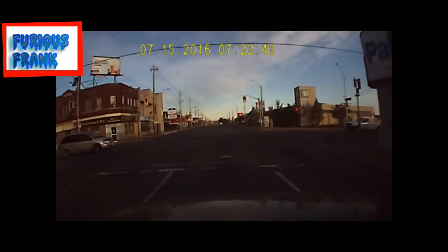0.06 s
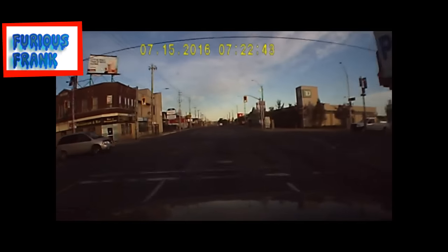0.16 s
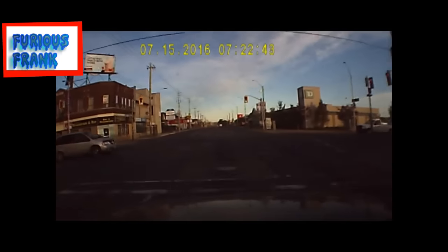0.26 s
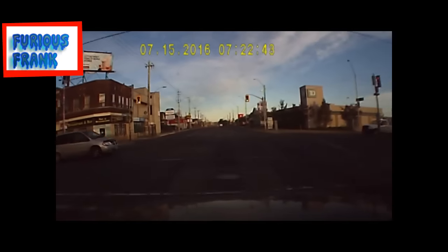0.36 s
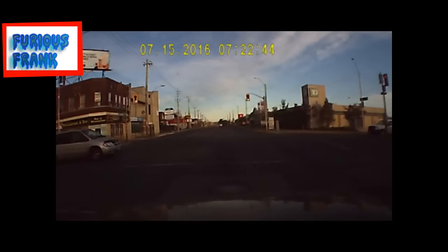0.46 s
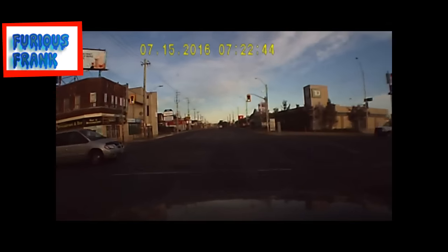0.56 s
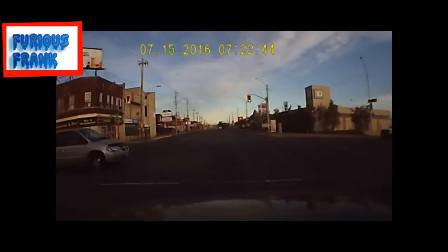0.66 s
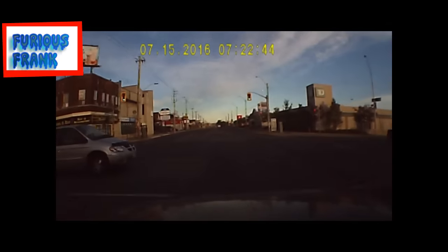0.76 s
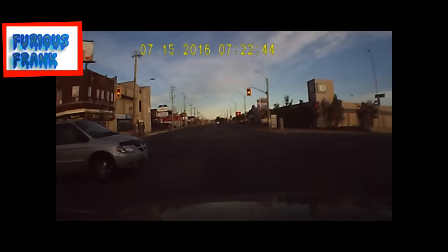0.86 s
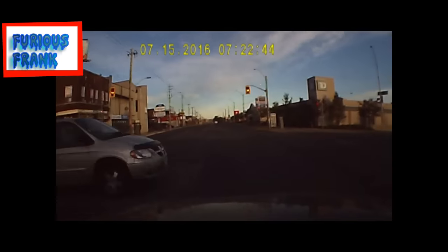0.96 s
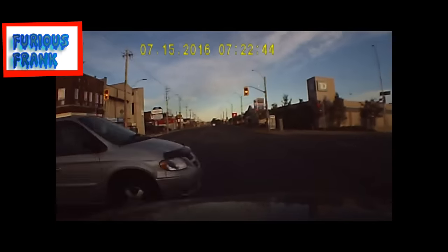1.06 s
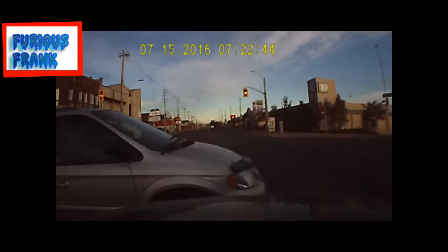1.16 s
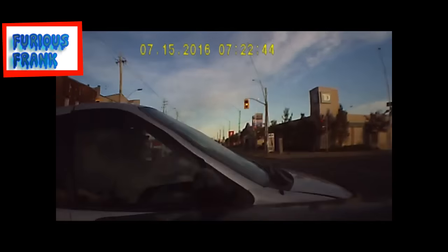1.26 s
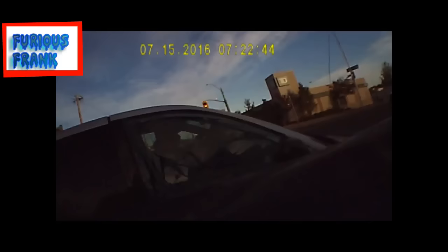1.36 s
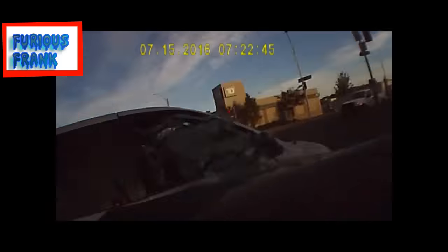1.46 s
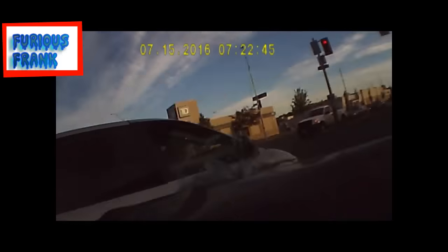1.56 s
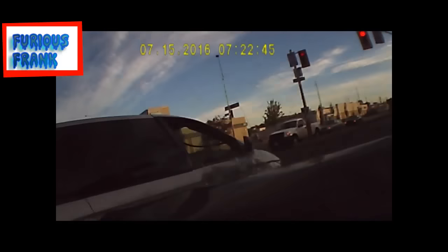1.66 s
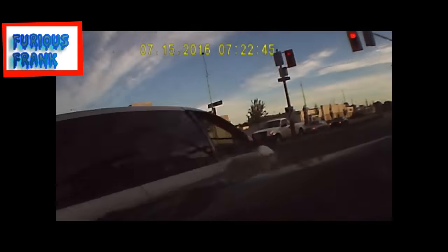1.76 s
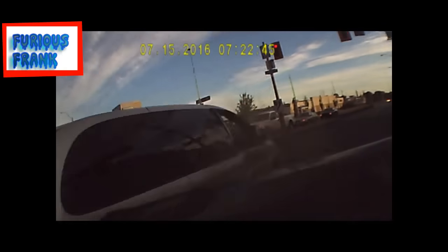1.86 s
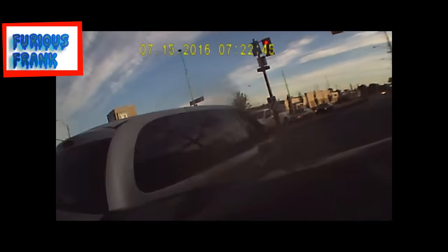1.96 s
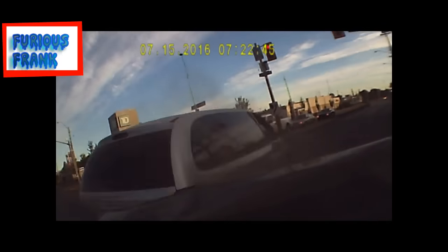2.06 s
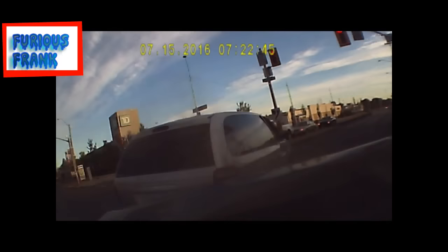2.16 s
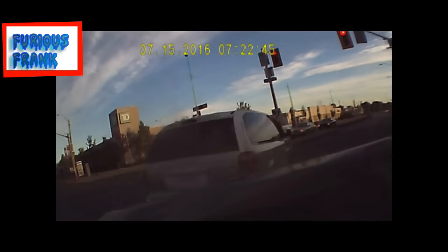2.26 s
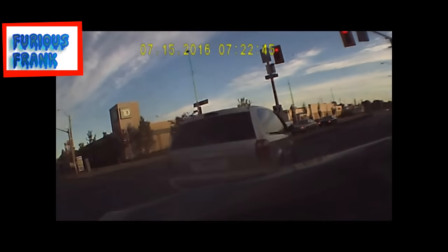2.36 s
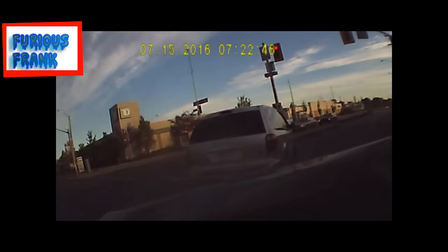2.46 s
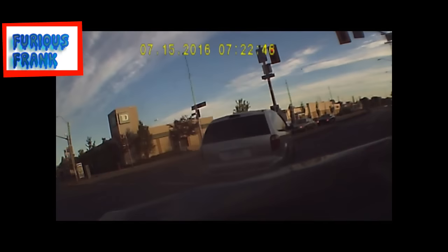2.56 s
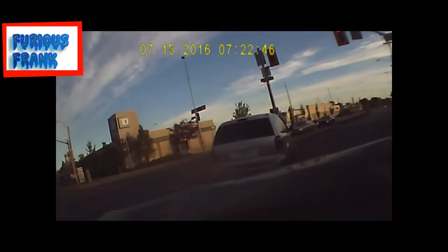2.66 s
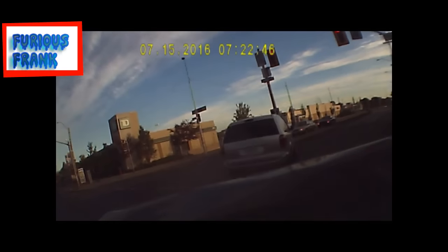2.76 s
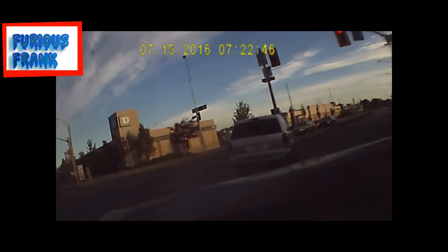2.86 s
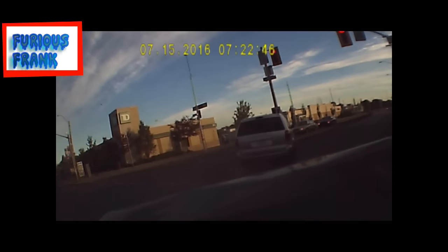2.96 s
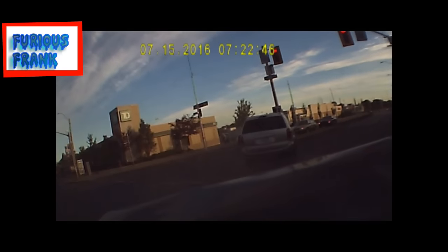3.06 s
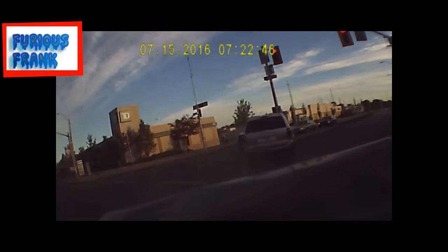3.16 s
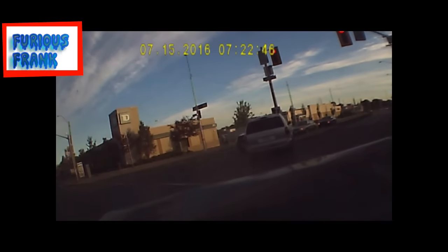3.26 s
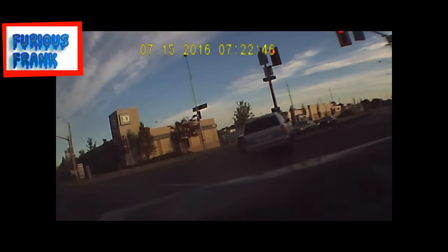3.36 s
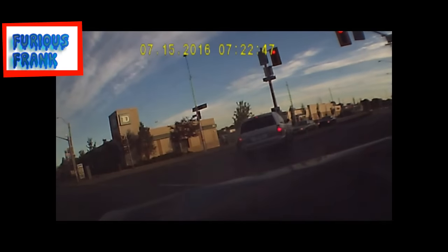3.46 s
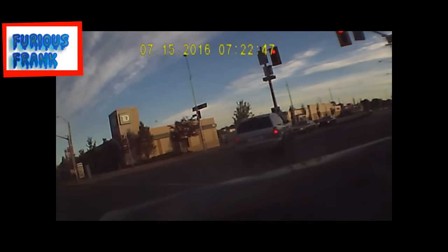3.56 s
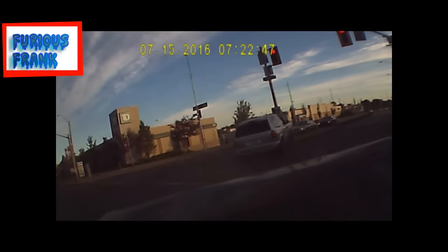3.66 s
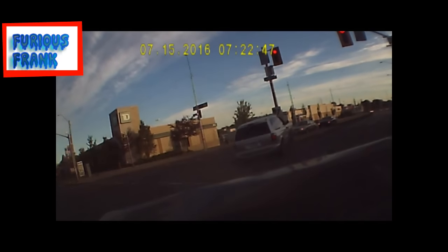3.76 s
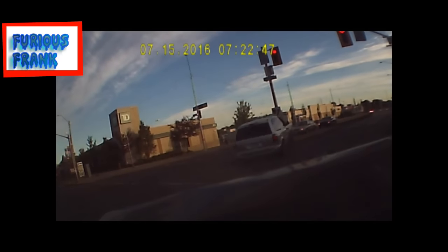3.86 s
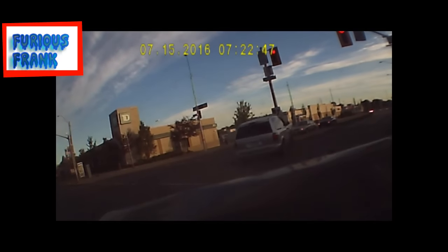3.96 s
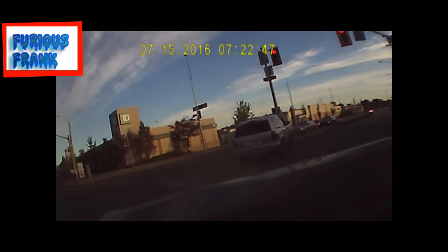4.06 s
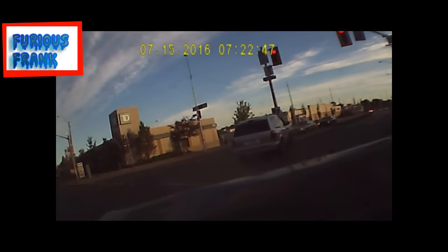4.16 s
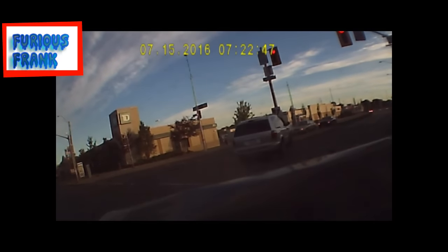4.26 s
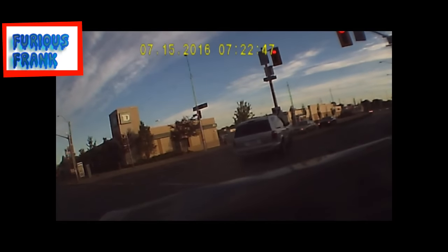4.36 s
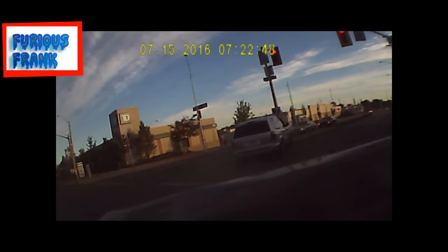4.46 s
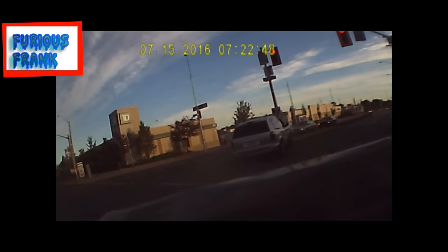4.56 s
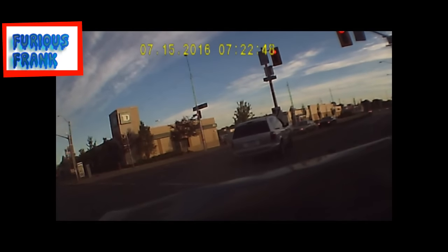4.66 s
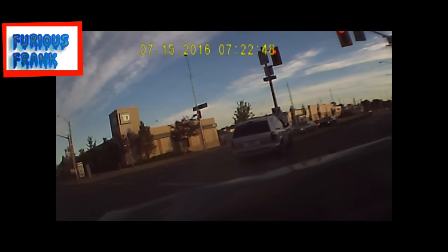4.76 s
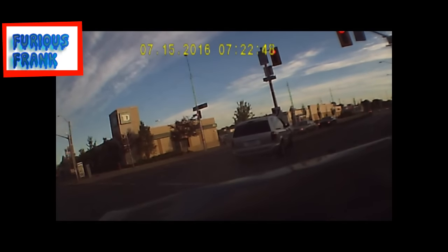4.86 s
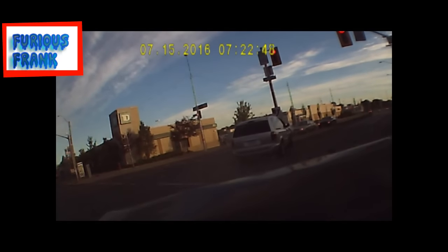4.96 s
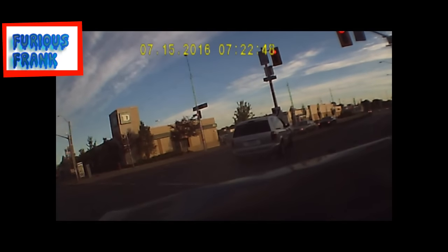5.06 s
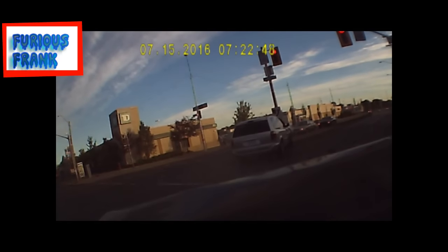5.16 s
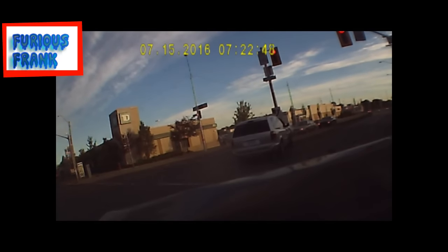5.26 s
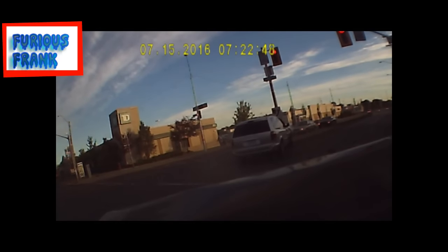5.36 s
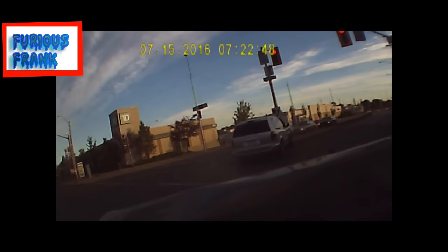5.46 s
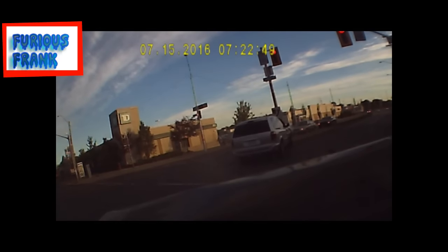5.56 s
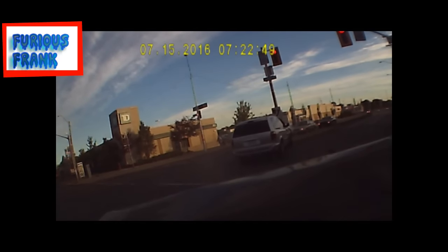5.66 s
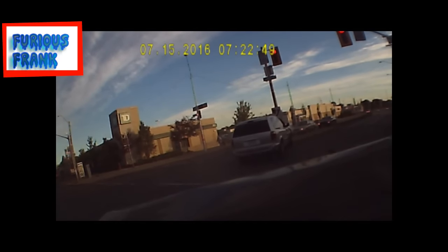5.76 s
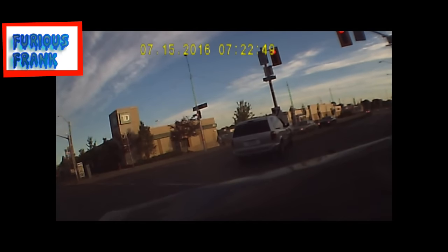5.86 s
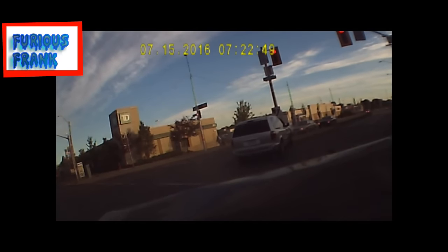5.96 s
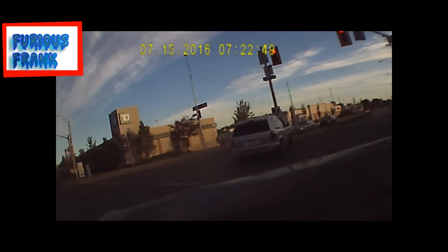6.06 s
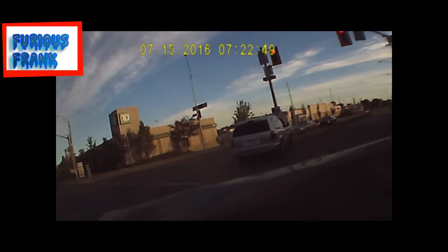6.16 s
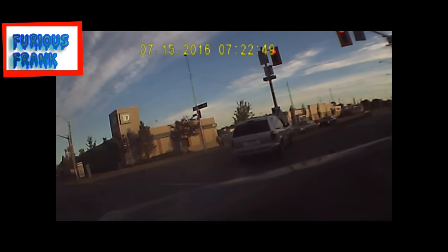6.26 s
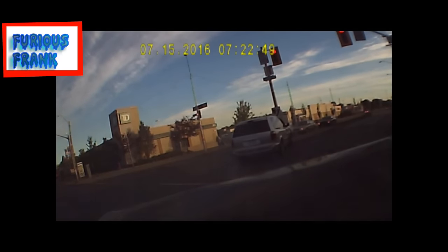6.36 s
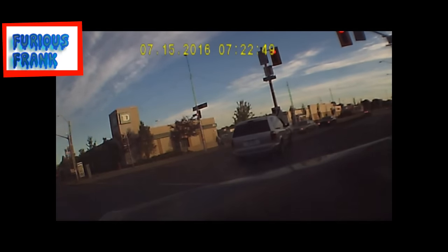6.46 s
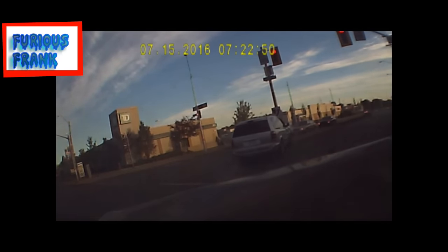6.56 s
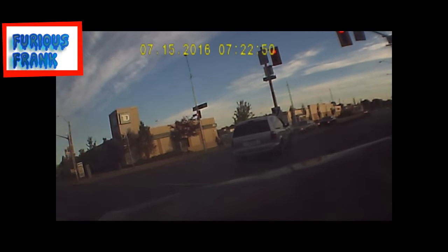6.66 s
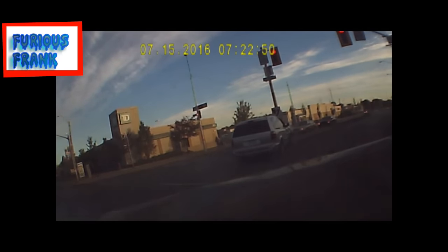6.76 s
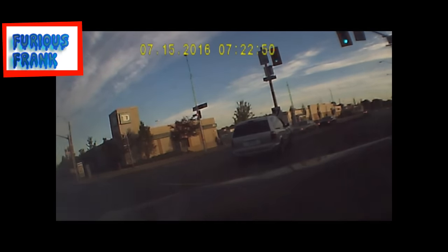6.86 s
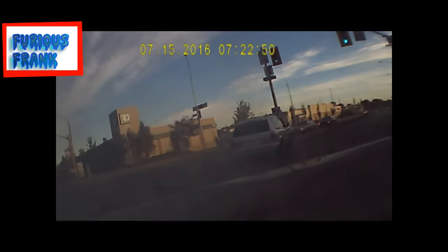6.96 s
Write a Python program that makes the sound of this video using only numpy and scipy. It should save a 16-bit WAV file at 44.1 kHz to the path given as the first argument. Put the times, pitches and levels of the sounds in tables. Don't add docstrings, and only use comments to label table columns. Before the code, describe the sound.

Low road rumble and trim knocks inside a moving car, then a violent overloaded crash, two short horn toots, tyre scrub, and small settling knocks.

```python
import sys
import numpy as np
from scipy import signal
from scipy.fft import rfft, irfft, next_fast_len
from scipy.io import wavfile
from scipy.ndimage import uniform_filter1d, map_coordinates

SR = 44100
rng = np.random.default_rng(int(sys.argv[2]) if len(sys.argv) > 2 else 0)


def gain_from_decibels(decibels):
    exponent = np.asarray(decibels, float) / 20
    return 10 ** exponent


def wav_record(signal):
    frames = np.transpose(np.atleast_2d(signal))
    bounded = np.clip(frames, -1, 1)
    quanta = np.round(bounded * 32767).astype(np.int16)
    wavfile.write(sys.argv[1], SR, quanta)


N = 308700

# time in seconds, force in dB over full scale, brightness in dB.
CRUMPLE = [(1.2, -40, -41), (1.213, 6, -2.5), (1.255, -1.5, 0), (1.275, 6, -8), (1.31, 8, -3),
           (1.34, 9, -10), (1.36, 10, -8), (1.4, 5.5, -6), (1.455, -17, -15), (1.48, -15.5, 1.5),
           (1.55, -9.5, -10.5), (1.64, -44, -22)]
# frequency in Hz, level in dB.
STEEL_TONE = [(20, -5.5), (60, -4.5), (150, 0.5), (300, -5), (500, -9.5), (800, -16)]
# frequency in Hz, level in dB.
SHARD_TONE = [(300, -49), (700, 5.5), (1100, 5.5), (1600, -5.5), (3000, -12), (8000, -20), (16000, -30)]
# start in seconds, length in seconds, push in full scales.
SLAMS = [(1.211, .06, -2.4), (1.2705, .02, 2), (1.29, .0195, -16), (1.3085, .0275, 1.4), (1.336, .019, -8),
         (1.3395, .003, 4.2), (1.4375, .0015, -1.2), (1.4125, .002, 3), (1.359, .009, -1.6),
         (1.368, .017, 1.2), (1.386, .0075, -1.8), (1.393, .012, 3.4), (1.405, .003, -1.5),
         (1.408, .003, 2), (1.411, .0235, -9), (1.4345, .026, 2.5), (1.481, .009, .35), (1.718, .014, .2),
         (1.461, .0205, -8), (1.496, .012, .55), (1.509, .0135, -4), (1.5225, .006, .9), (1.76, .022, .3),
         (1.785, .012, -1.2), (1.832, .012, .4), (1.843, .019, -.3)]
# time in seconds, level in dB.
SHATTER = [
    (1.205, -70),
    (1.22, -34),
    (1.245, -32),
    (1.27, -35),
    (1.29, -70),
]
# frequency in Hz, level in dB.
GLASS_TONE = [(1500, -30), (2500, 11), (6000, -6), (11000, -18), (16000, -1)]
# time in seconds, peak in dB.
TICKS = [(0.4544, -41), (0.8639, -34), (1.587, -19), (1.6344, -20), (1.6646, -35), (1.829, -25),
         (1.9076, -38), (1.9285, -39), (1.984, -28), (2.106, -29), (1.6954, -35), (1.1267, -46),
         (2.0076, -27), (2.3, -40), (2.383, -36), (2.665, -34), (2.7544, -32), (2.7694, -35), (3.473, -37)]
# on in seconds, off in seconds, level in dB, overtone lift in dB, flutter in dB.
HORN = [
    (1.53, 1.74, -19.5, 2.5, 3),
    (2.012, 2.153, -18.5, -0.3, 0.8),
]
# multiple of the pitch, level in dB.
HORN_PARTIALS = [(1, 3.5), (2, -1), (3, -3), (4, -19), (5, -40), (6, -27), (7, -30), (8, -39), (9, -31)]
# time in seconds, level in dB.
TYRES = [
    (1.5, -63),
    (1.57, -26),
    (1.7, -28),
    (1.76, -18.5),
    (1.85, -26.5),
    (1.95, -35),
    (2.06, -35),
    (2.16, -32),
    (2.35, -66),
]
# frequency in Hz, level in dB.
TREAD_TONE = [(1100, -33), (1300, -1.5), (1450, 5), (1600, -6.5), (1750, -40)]
# time in seconds, level in dB.
GROAN = [
    (3.2, -74),
    (3.235, -29),
    (3.27, -42),
    (3.38, -35),
    (3.5, -45),
    (3.6, -57),
    (3.7, -70),
]
# frequency in Hz, level in dB.
PAD_TONE = [(620, -40), (740, -3), (790, 0.1), (840, -12), (980, -42)]
# start in
# seconds, length in seconds, start and end pitch in Hz, peak in dB.
RINGS = [(1.2025, .012, 400, 800, -11), (1.4345, .007, 1500, 900, 0), (1.4565, .005, 1300, 1000, -10),
         (2.2, .17, 1570, 1520, -39), (2.437, .016, 1280, 1320, -28), (2.453, .012, 2150, 2100, -31),
         (2.797, .016, 2900, 2880, -38), (2.797, .016, 3800, 3780, -39), (2.61, .016, 1050, 1020, -32),
         (5.57, .03, 2100, 2000, -38), (5.465, .014, 620, 560, -35), (2.168, .014, 760, 740, -19),
         (2.19, .01, 1150, 1150, -27), (1.862, .02, 800, 1250, -17), (1.995, .03, 780, 800, -28),
         (.526, .016, 1000, 900, -18), (.905, .016, 520, 480, -27), (1.072, .02, 820, 760, -30),
         (.695, .012, 480, 460, -25), (1.209, .064, 295, 250, 12), (1.481, .016, 1100, 1080, -7),
         (1.51, .06, 135, 125, -4), (1.797, .016, 1420, 1450, -12), (1.808, .028, 1470, 1590, -22),
         (1.86, .022, 330, 380, -9), (1.884, .025, 450, 430, -17), (1.725, .035, 1350, 1420, -22),
         (2.1675, .012, 1250, 1200, -10), (1.875, .18, 1590, 1500, -31), (.52, .016, 1150, 950, -17),
         (.71, .008, 940, 880, -13), (.516, .008, 420, 500, -20), (.529, .014, 560, 480, -14),
         (.622, .01, 1100, 1050, -28), (.992, .012, 1950, 1900, -30), (.988, .012, 3750, 3600, -28),
         (.99, .008, 2950, 2900, -33), (1.888, .008, 3500, 3450, -28), (1.958, .016, 3800, 3750, -36),
         (2.04, .012, 3600, 3500, -30), (.71, .006, 3600, 3500, -33), (1.779, .008, 620, 560, -13),
         (2.2, .17, 1570, 1520, -39), (2.437, .016, 1280, 1320, -28), (2.453, .012, 2150, 2100, -31),
              (2.797, .016, 2900, 2880, -38), (2.797, .016, 3800, 3780, -39), (2.61, .016, 1050, 1020, -32),
              (3.03, .11, 1050, 1040, -44), (3.06, .04, 720, 700, -43), (3.15, .035, 1110, 1120, -31),
              (3.155, .02, 1380, 1360, -32), (3.165, .035, 400, 440, -32), (4.8, .12, 415, 410, -46),
              (5.465, .014, 620, 560, -35), (5.57, .03, 2100, 2000, -38), (5.575, .012, 2000, 2050, -33),
              (5.603, .01, 3100, 3000, -37), (6.087, .012, 520, 500, -32), (6.68, .012, 1500, 1450, -42)]
# start in seconds, pitch in Hz, 60 dB decay in seconds, peak in dB.
THUMPS = [(.52, 233, 0.088, -9.5), (2.089, 115.4, 0.38, -25), (2.22, 143, 0.17, -31),
          (2.43, 54.7, 0.31, -20), (2.919, 125, 0.11, -26.5), (1.73, 217, 0.133, -7.5),
          (2.399, 95, 0.11, -24), (2.401, 243, 0.061, -14.5), (.775, 160, 0.13, -23.5),
          (0.059, 151, 0.099, -36), (2.514, 178, 0.24, -21.5), (2.581, 94, 0.054, -11),
          (2.719, 74.6, 0.083, -11), (2.735, 149, .15, -25.5), (2.735, 149, .15, -25.5),
          (2.814, 84, 0.15, -15), (2.87, 70, 0.4, -24.5), (3.225, 110, 0.18, -25), (3.37, 131, 0.095, -23),
          (3.271, 188, .12, -29), (3.42, 170, .12, -27), (5.465, 250, 0.067, -30),
          (6.084, 384, 0.046, -23.5), (6.588, 400, 0.046, -21), (6.606, 390, 0.047, -27)]
# start in seconds, peak in dB,
# thud in dB, tick in dB.
KNOCKS = [(.521, -9, -6, -15), (0.624, -27.5, -13, -12), (0.695, -17.5, -5.5, -24),
          (.71, -21.5, -2, -5), (0.809, -21, -2.5, -20), (.902, -21, -25, -15),
          (0.956, -26.5, 3.5, -22), (.989, -25, -10, -4.5), (1.07, -20, -21, -35),
          (1.481, -7, -20, -32), (1.563, -15, -15, -5.5), (1.585, -10, -23, -24),
          (1.708, -11.5, -16, -12.5), (1.727, -10.5, -12, -12), (1.748, -16.5, -8, -8),
          (1.77, -14.5, -14, -8), (1.861, -5, -9, -26), (1.889, -16, -16, -15),
          (1.955, -28, -15, -2), (2.039, -16, -9, -10.5), (2.167, -11.5, -28, -35),
          (2.331, -25.5, -0.5, -37), (2.403, -20.5, 1.5, -29), (2.437, -18, -16, -27),
                   (2.454, -20.5, -7, -14.5), (2.998, -27, -20, -5), (2.59, -28, 6.5, -31),
                   (2.659, -44, -3, -9), (2.72, -34.5, 8, -14), (2.798, -42.5, -9, 3),
                   (2.819, -37, 13.5, -16), (2.907, -36, -8, -7), (2.991, -24, -30, -10),
                   (3.147, -18.5, -30, -19), (3.154, -28, -27, -13), (3.161, -32, -12, -8),
                   (3.235, -26, -3, -20), (3.379, -24.5, -2, -18), (4.001, -32.5, -11, -25),
                   (4.748, -34, -6.5, -13), (5.199, -40, 4, -22), (5.309, -31, -18, -23),
                   (5.465, -29, -16, -20), (5.609, -32.5, -6, -13), (5.912, -36, -3, -10),
                   (6.091, -30.5, -8, -20), (5.53, -45, -20, -8), (5.556, -40, -25, -8),
                   (5.585, -36, -20, -6), (6.198, -40, -9, -13), (6.587, -33, -11, -9),
                   (6.607, -27.5, -4, -19), (6.682, -43, -6, -7)]
# frequency in Hz, level in dB.
TICK_TONE = [(900, -17), (1700, 4), (2200, 0.5), (3000, -2), (3700, -7.5), (4400, -11.5), (7000, -23),
             (11500, -31)]
# start in seconds, length in seconds, heavy part in dB, fine part in dB.
SCUFFS = [(0.515, 0.042, -21.5, -47), (0.669, 0.033, -30.5, -53), (0.933, 0.055, -26.5, -43),
          (2.637, 0.047, -55, -46), (3.133, 0.07, -34, -46.5), (5.11, 0.15, -53, -61),
          (5.231, 0.11, -48.5, -48), (5.33, 0.097, -46, -52), (5.415, 0.1, -41, -48),
          (5.498, 0.13, -36.5, -36.5), (5.697, 0.26, -51.5, -64), (5.902, 0.19, -47.5, -57),
          (6.017, 0.17, -39, -49.5), (6.176, 0.083, -43.5, -55), (6.547, 0.12, -38.5, -52),
          (6.705, 0.13, -51, -53.5), (6.864, 0.082, -53, -54)]
# frequency in Hz, level in dB.
RUB_TONE = [(700, -59), (1150, 5.5), (1500, 9), (2000, 3.5), (2250, -24), (2800, -28)]
# start in seconds, first push in full scales, rate in Hz, 60 dB decay in seconds.
JOLTS = [(0, 0.21, 29, 0.28), (.59, -0.058, 25, 0.32), (0.724, -0.41, 31, 0.14), (.768, -0.22, 25, 0.26),
         (0.954, -0.23, 24, 0.43), (0.998, -0.35, 30.5, 0.18), (1.523, 0.33, 25.3, 0.34),
         (1.602, 0.23, 31, 0.21), (1.665, -0.24, 33.5, 0.52), (1.73, -0.23, 20.8, 0.24),
         (1.865, 0.21, 16, 0.28), (1.917, -0.18, 29, 0.23), (2.004, -0.12, 28, 0.35)]
# time in seconds, body sway in dB, trim rattle in dB.
MOTION = [(0, -43, -41.5), (.45, -36, -39.5), (.83, -34, -34.5), (1.12, -32.5, -38), (1.19, -40, -42),
          (1.5, -27, -24), (1.57, -33, -22.5), (1.68, -22.5, -22.5), (1.9, -19, -28), (2.0, -28.5, -29),
          (2.35, -38, -39.5), (2.74, -36, -37.5), (3.0, -45, -43.5), (3.95, -48, -46.5), (4.55, -51, -51.5),
          (4.85, -51, -47.5), (5.1, -50.5, -52.5), (7, -50, -50)]
# frequency in Hz, level in dB.
RUMBLE_TONE = [(12, -9), (25, -3.5), (45, -6), (80, -23.5), (130, -49)]
# frequency in Hz, level in dB.
BOOM_TONE = [(50, -46), (90, 2.5), (130, -3), (220, 2), (400, -5), (650, -21.5)]
# frequency in Hz, level in dB.
TRIM_TONE = [(250, -34), (420, -2.5), (750, -0.5), (1000, -3.5), (1400, -7), (1600, -16.5), (1800, -17),
             (2600, -30)]
# frequency in Hz, level in dB.
RUSTLE_TONE = [(1100, -14), (1900, 0), (2500, -4), (3300, -1.5), (3900, -5), (4600, -12), (8000, -24),
               (11500, -22.5)]
# start, peak, beginning of the fade and end, in seconds.
SCRAPE_S = (3.2, 3.25, 3.56, 3.85)
SCRAPE_MIX_DB = [-1, -2.5, 0, -17]
SCRAPE_FADES = [4.4, 1.4, 0.83, 1.1]
# frequency in Hz, level in dB.
VENT_TONE = [(850, -30), (1150, -1), (1350, 0), (1500, -1), (1750, -26)]
# time in seconds, upper and lower headroom in full scales.
RAILS = [
    (0, 0.27, 0.28),
    (1.19, .3, .24),
    (1.215, 0.38, 0.22),
    (1.3, .42, .23),
    (1.45, 0.42, 0.22),
    (1.6, 0.38, 0.29),
    (1.9, 0.29, 0.21),
    (2.1, .17, 0.22),
    (2.6, 0.24, 0.28),
    (7, .3, .2),
]
# from, full, until and over, in seconds.
DAZED_S = (1.275, 1.29, 1.53, 1.6)
# frequency in Hz, level in dB.
HISS_TONE = [(20, 9), (200, 4.5), (1500, 3.5), (4000, -1.5), (8000, -3), (11000, -3.5), (12400, -8.5)]

HORN_HZ = 385.2
STRUCK_S = .017
WAVER, BUCKLING_WAVER = .022, .16
KNOCK_T60_S, TICK_T60_S = 0.083, 0.037
TICK_GAIN_DB = 6.5
SCUFF_TRIM_DB, SCUFF_RUSTLE_DB = -3.5, -2
RUMBLE_DB, RUMBLE_GROWS = -43.5, 1
RUSTLE_DB, RUSTLE_GROWS = -62.5, 0.85
ROAD_DULLS_DB, IMPACT_S = -12.5, 1.3
STIR_S, STIR_DB = 5.15, 6.5
SCRAPE_DB, SCRAPE_SAG_DB = -33.5, -2
VENT_DB = -55.5
DAZED_SHARE = .7
EDGE_FULL = .05
OFFSET = -.3165


def curves(rows):
    s, *cols = np.transpose(rows)
    return [np.interp(np.arange(N) / SR, s, c) for c in cols]


def unit(x):
    return x / np.sqrt(np.mean(x ** 2) + 1e-20)


def coloured(x, spectrum):
    m = next_fast_len(len(x) + 8192)
    f, db = np.transpose(spectrum)
    log_hz = np.log(np.fft.rfftfreq(m, 1 / SR) + 1)
    gain = gain_from_decibels(np.interp(log_hz, np.log(f), db, left=-90, right=-90))
    return irfft(rfft(x, m) * gain, m)[:len(x)]


def causal(x, spectrum):
    f, db = np.transpose(spectrum)
    log_hz = np.log(np.fft.rfftfreq(8192, 1 / SR) + 1)
    log_gain = np.log(gain_from_decibels(np.interp(log_hz, np.log(f), db, left=-60, right=-60)))
    fold = irfft(log_gain) * np.r_[1, np.full(4095, 2), 1, np.zeros(4095)]
    return signal.fftconvolve(x, irfft(np.exp(rfft(fold))))[:N]


def wobble(rate):
    knots = rng.standard_normal(int(N * rate / SR) + 4)
    return map_coordinates(knots, [np.arange(N) * rate / SR])


def rough(spectrum, lumps_db, rate):
    jumps = gain_from_decibels(lumps_db * (wobble(rate) + 0.53 * wobble(5.1 * rate)))
    return unit(coloured(jumps * rng.standard_normal(N), spectrum))


def hump(length, lean):
    return np.sin(np.pi * np.linspace(0, 1, round(length * SR)) ** lean)


def crash():
    force_db, bright_db = curves(CRUMPLE)
    metal = rough(STEEL_TONE, lumps_db=1.0, rate=37)
    metal += gain_from_decibels(bright_db) * rough(SHARD_TONE, lumps_db=3.0, rate=80)
    push = np.zeros(N)
    for s, length, size in SLAMS:
        shape = np.abs(hump(length, 0.68)) ** 0.53
        push[round(s * SR):][:len(shape)] += size * shape
    return gain_from_decibels(force_db) * (force_db > -39) * metal + push


def shatter():
    level_db, = curves(SHATTER)
    return gain_from_decibels(level_db) * (level_db > -65) * rough(GLASS_TONE, lumps_db=3, rate=150)


def ticks():
    drive, t = np.zeros(N + SR), np.arange(SR // 10) / SR
    fade = gain_from_decibels(-60 * t / TICK_T60_S) * (1 - np.exp(-t / .0012))
    for s, db in TICKS:
        drive[round(s * SR):][:len(t)] += gain_from_decibels(db + TICK_GAIN_DB) * fade * rng.standard_normal(len(t))
    return causal(drive, TICK_TONE)


def horn():
    out, waver, flutter = np.zeros(N), wobble(60), wobble(35.58)
    for on, off, db, lift_db, flutter_db in HORN:
        where = slice(round(on * SR), round(off * SR))
        t = np.arange(N)[where] / SR
        swing = np.clip(np.minimum((t - on) / 0.058, (off - t) / 0.034), 0, 1)
        turn = 2 * np.pi * np.cumsum(HORN_HZ * (1 + .0025 * waver[where])) / SR
        tone = np.zeros(len(t))
        for k, level_db in HORN_PARTIALS:
            partial = -np.cos(k * turn + 0.244 * k * k)
            level = gain_from_decibels(level_db + lift_db * (k > 1) + 0.2 * k * waver[where])
            tone += level * swing ** (0.49 * k) * partial
        out[where] = gain_from_decibels(db + flutter_db * flutter[where]) * unit(tone)
    return out


def tyres():
    scrub_db, = curves(TYRES)
    return gain_from_decibels(scrub_db) * (scrub_db > -55) * rough(TREAD_TONE, lumps_db=2.2, rate=40)


def groan():
    level_db, = curves(GROAN)
    return gain_from_decibels(level_db) * (level_db > -65) * rough(PAD_TONE, lumps_db=1.5, rate=25)


def rings():
    out, waver = np.zeros(N), wobble(220)
    for s, length, start_hz, end_hz, db in RINGS:
        struck = length <= STRUCK_S
        shape = hump(length, 0.4 if struck else 0.71)
        if struck:
            shape = shape * gain_from_decibels(np.linspace(3, -9, len(shape)))
        where = slice(round(s * SR), round(s * SR) + len(shape))
        unsteady = BUCKLING_WAVER if db > 0 else WAVER
        pitch_hz = np.linspace(start_hz, end_hz, len(shape)) * (1 + unsteady * waver[where])
        turn = 2 * np.pi * np.cumsum(pitch_hz) / SR
        out[where] += gain_from_decibels(db) * (np.sin(turn) + 0.14 * np.sin(2 * turn)) * shape
    return out


def thumps():
    out, t = np.zeros(N + SR), np.arange(SR // 3) / SR
    rise = 1 - np.exp(-t / 0.00083)
    for s, hz, t60, db in THUMPS:
        swing = np.sin(2 * np.pi * hz * t * (1 - 1.0 * t))
        out[round(s * SR):][:len(t)] -= gain_from_decibels(db - 60 * t / t60) * swing * rise
    return out[:N]


def knocks():
    drive, t = np.zeros((3, N + SR)), np.arange(SR // 5) / SR
    t60 = KNOCK_T60_S * np.array([[2.1], [.8], [.4]])
    fade = gain_from_decibels(-60 * t / t60) * (1 - np.exp(-t / 0.00025))
    for s, db, thud_db, tick_db in KNOCKS:
        burst = rng.standard_normal((3, len(t))) * fade
        levels_db = db + np.array([[thud_db + 18.0], [9], [tick_db + 12.5]])
        drive[:, round(s * SR):][:, :len(t)] += burst * gain_from_decibels(levels_db)
    return causal(drive[0], BOOM_TONE) + causal(drive[1], TRIM_TONE) + causal(drive[2], TICK_TONE)


def scuffs():
    swell = np.zeros((4, N))
    for s, length, heavy_db, fine_db in SCUFFS:
        shape = np.abs(hump(length, 1.04)) ** .75
        levels_db = [heavy_db, heavy_db + SCUFF_TRIM_DB, fine_db, fine_db + SCUFF_RUSTLE_DB]
        swell[:, round(s * SR):][:, :len(shape)] += gain_from_decibels(levels_db)[:, None] * shape
    tones = [BOOM_TONE, TRIM_TONE, RUB_TONE, RUSTLE_TONE]
    return sum(level * rough(tone, lumps_db=1.1, rate=65) for level, tone in zip(swell, tones))


def jolts():
    out, t = np.zeros(N + SR), np.arange(SR // 2) / SR
    rise = 1 - np.exp(-t / 0.0076)
    for s, size, hz, t60 in JOLTS:
        out[round(s * SR):][:len(t)] += size * gain_from_decibels(-60 * t / t60) * np.sin(2 * np.pi * hz * t) * rise
    return 1.58 * out[:N]


def cabin():
    t = np.arange(N) / SR
    sway_db, rattle_db = curves(MOTION)
    rumble_db = np.minimum(RUMBLE_DB + RUMBLE_GROWS * (sway_db + 51.5), -28)
    rustle_db = RUSTLE_DB + RUSTLE_GROWS * (rattle_db + 49.0)
    rustle_db += ROAD_DULLS_DB * np.clip(IMPACT_S - t - .3, 0, 1)
    rustle_db += STIR_DB * (t > STIR_S)
    scrape_db = np.interp(t, SCRAPE_S, [-14, 0, SCRAPE_SAG_DB, -17], left=-90, right=-90)
    scrape_db = scrape_db * np.array(SCRAPE_FADES)[:, None] + SCRAPE_DB + np.array(SCRAPE_MIX_DB)[:, None]
    motion_db = [rumble_db, sway_db, rattle_db, rustle_db]
    rumble, boom, trim, rustle = np.hypot(gain_from_decibels(motion_db), gain_from_decibels(scrape_db))
    out = rumble * rough(RUMBLE_TONE, lumps_db=1.2, rate=5.0)
    out += boom * rough(BOOM_TONE, lumps_db=1.5, rate=16)
    out += trim * rough(TRIM_TONE, lumps_db=1.4, rate=30)
    return out + rustle * rough(RUSTLE_TONE, lumps_db=1.4, rate=40)


def vent():
    return gain_from_decibels(VENT_DB) * rough(VENT_TONE, lumps_db=4.0, rate=20)


def scene():
    impact = crash() + ticks() + horn() + tyres() + groan()
    body = rings() + thumps() + knocks() + scuffs() + jolts()
    return (impact + body + cabin() + vent())[None]


def top_cut(x):
    return signal.sosfilt(signal.butter(12, 16250, fs=SR, output="sos"), x)


def record(dry):
    headroom = np.where(dry > 0, *curves(RAILS))
    clipped = (dry / (1 + np.abs(dry / headroom) ** 5) ** (1 / 5))[0]
    clipped -= .08 * signal.lfilter([.0012], [1, -.9988], clipped)
    dazed = DAZED_SHARE * np.interp(np.arange(N) / SR, DAZED_S, [0, 1, 1, 0])
    clipped += dazed * (uniform_filter1d(clipped, size=5) - clipped)
    edges = np.sqrt(np.abs(uniform_filter1d(np.diff(clipped, prepend=0) ** 2, size=200)))
    fuzz = gain_from_decibels(-7.0) * edges * unit(coloured(rng.standard_normal(N), SHARD_TONE))
    hiss = gain_from_decibels(-54.5) * unit(coloured(rng.standard_normal(N), HISS_TONE))
    hiss *= np.where(dry[0] > -1.5, 1, 0) * np.where(dry[0] > 1.5, .35, 1)
    crackle = shatter() * np.clip(edges / EDGE_FULL, 0, 1)
    # frequency in Hz, gain in dB.
    band = [(1, -1.0), (11000, -2.0), (11600, -5.0), (12300, -15), (13000, -13), (16000, -19), (16400, -55)]
    mix = coloured(clipped + fuzz + hiss + crackle, band)[None] + OFFSET
    return top_cut(mix)


dry = scene()
out = record(dry)
wav_record(out)
```